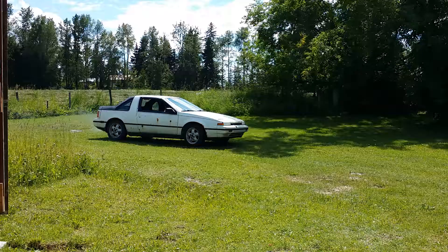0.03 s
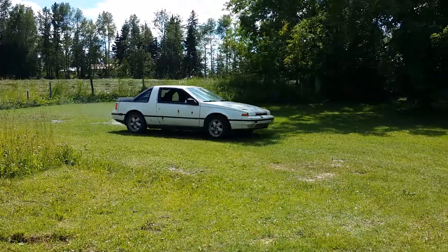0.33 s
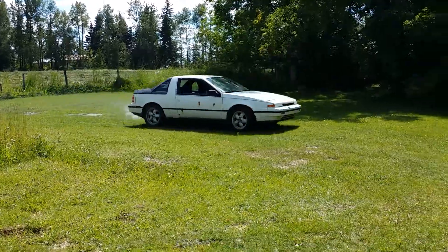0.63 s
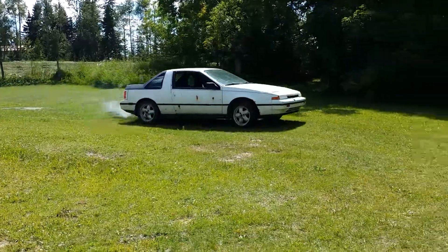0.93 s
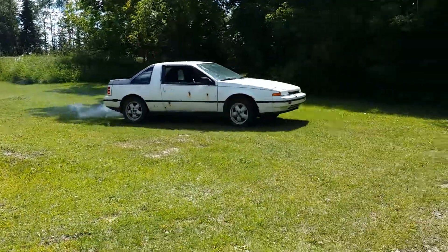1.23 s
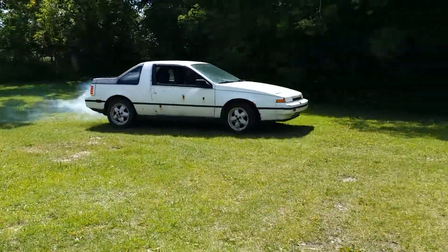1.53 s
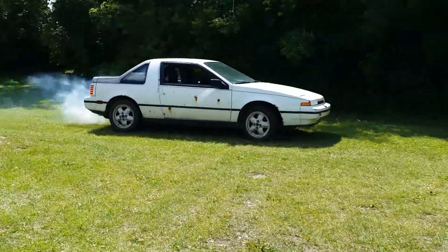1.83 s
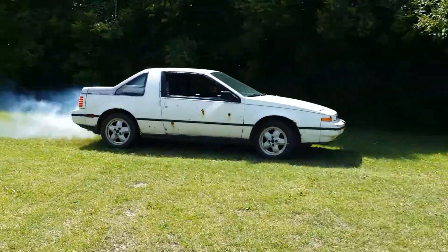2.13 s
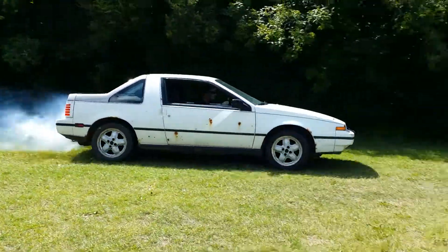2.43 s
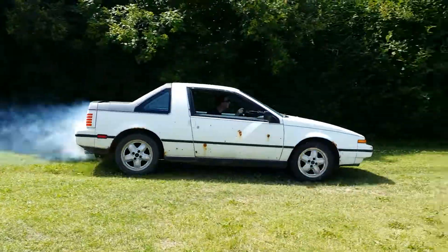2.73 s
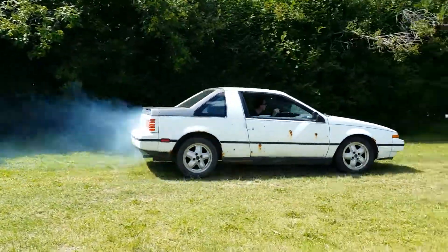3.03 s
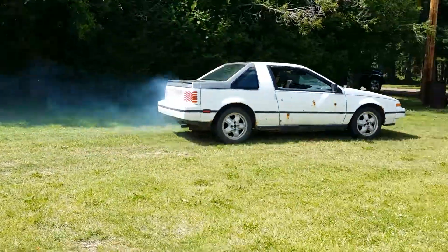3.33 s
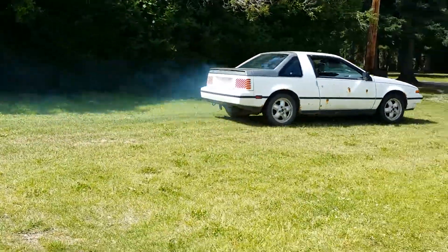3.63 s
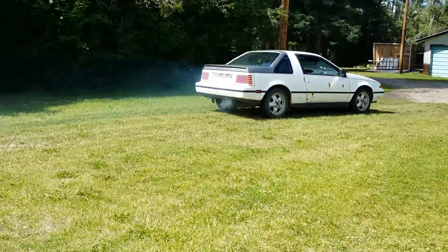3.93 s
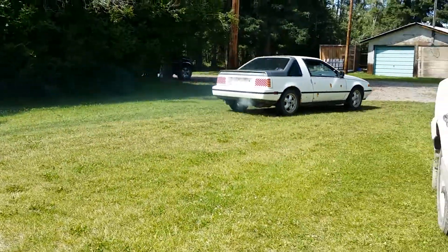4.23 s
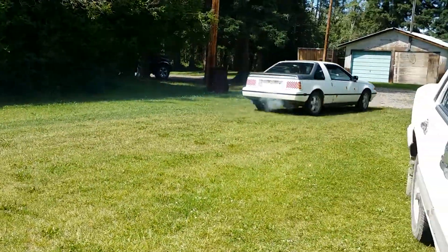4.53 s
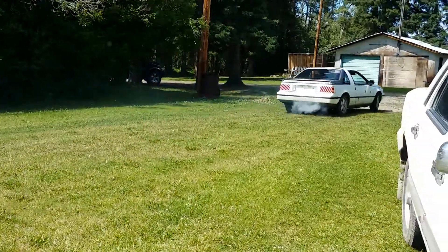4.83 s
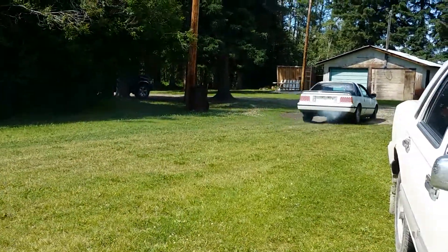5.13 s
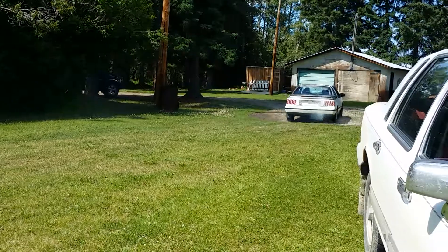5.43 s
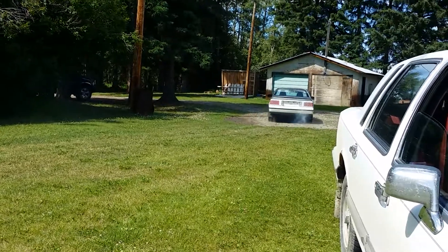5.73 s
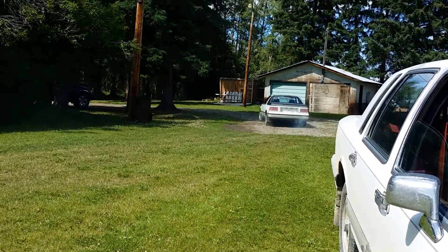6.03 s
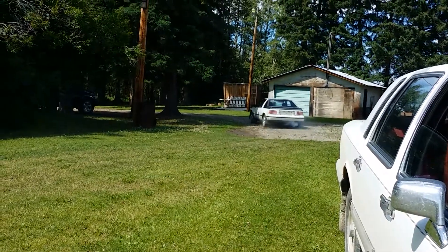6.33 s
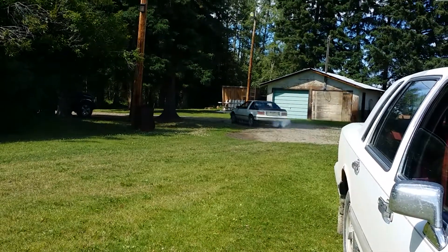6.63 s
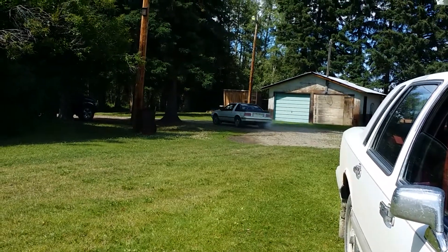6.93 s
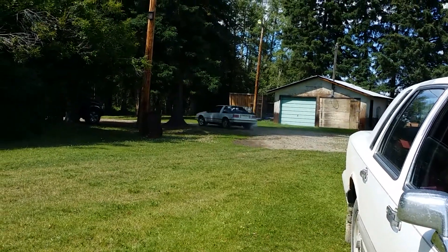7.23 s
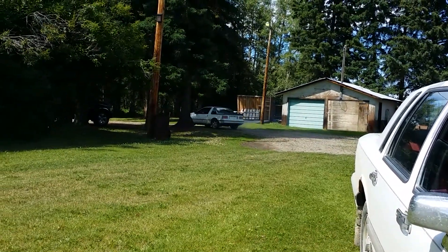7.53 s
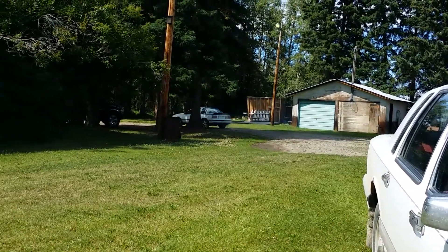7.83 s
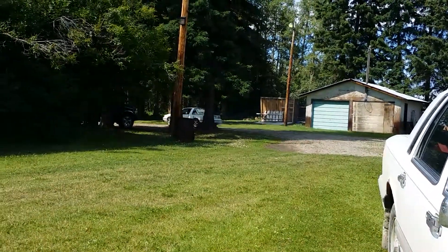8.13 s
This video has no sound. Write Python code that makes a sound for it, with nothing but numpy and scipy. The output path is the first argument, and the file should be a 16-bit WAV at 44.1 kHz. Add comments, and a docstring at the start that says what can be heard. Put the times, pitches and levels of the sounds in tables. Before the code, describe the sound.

Outdoors in a yard, a loud, misfiring car engine revs up, drops back as it passes near the microphone and carries on unevenly into the distance. Its leaky exhaust thumps, drones and rasps over a soft whirr of tyres and fan. A low knock sounds close by, then a short metallic rattle and several sharp exhaust pops come from the departing car, echoing faintly.

```python
"""An old car's rough, uneven chugging swells up, passes close by and pulls away across a lawn. Each firing of
its four cylinders thumps the muffler, rings the pipe and hisses out of the exhaust leaks. When a cylinder cuts
out the engine limps and rasps; coasting, it purrs evenly. The loose pipe rattles, sharp pops crack out of it,
and a leak under the floor sputters as the car passes. Behind all this are the whirr of fan and tyres, one dull
knock and faint echoes from trees and buildings."""
import sys
import numpy as np
from scipy import signal
from scipy.io import wavfile
from scipy.ndimage import uniform_filter1d, minimum_filter1d, map_coordinates

SR = 44100
rng = np.random.default_rng(int(sys.argv[2]) if len(sys.argv) > 2 else 0)


def output_pcm(signal):
    """Save a mono or channel-first signal as 16-bit PCM at the path in sys.argv[1].

    Samples are clipped to [-1, 1] before scaling.
    """
    pcm = np.clip(np.atleast_2d(signal).T, -1, 1) * 32767
    wavfile.write(sys.argv[1], SR, np.round(pcm).astype(np.int16))


N = 360738
TIME = np.arange(N) / SR

# How long the yard's echoes take to fade by 60 dB: pitch_hz, fade_s
ECHO_FADE = [(100, 1), (700, 0.32), (3000, 0.15), (10000, 0.021)]
# Loudness of the fan and tyres: time_s, level_db
WHIRR_LEVEL = [(.42, -31.5), (.8, -28.5), (2.3, -29), (2.8, -34), (3.7, -36.5), (5.4, -35.5), (5.46, -41),
               (5.8, -34.5), (7.2, -35.5), (8.18, -40)]
# Tone colours, that is, how strong each pitch is in a sound: pitch_hz, gain_db
WHIRR_TONE = [(30, 0.5), (200, 10), (700, 8.5), (1050, -0.5), (1450, -1.5), (1700, -4.5), (2000, -2),
              (2100, 5), (2210, -5), (2450, -5.5), (2750, -4.5), (3000, -8), (3350, -5.5), (4400, -9),
              (5900, -10.5), (7400, -16.5), (15500, -27)]
RATTLE_TONE = [(300, -29), (780, 18.5), (950, -5), (1150, 13.5), (1400, -0.5), (1800, -4), (2250, -7),
               (3500, -27), (4700, -21), (5500, 9.5), (6300, -1.5), (7500, -17.5), (15500, -33)]
FLOOR_LEAK_TONE = [(150, -18), (400, 3.5), (520, -1), (700, 4), (850, -9), (1050, -1), (1500, -26),
                   (2300, -13), (3500, -22), (5800, -22), (8000, -33), (15500, -47)]
ECHO_TONE = [(120, -7), (700, 3), (8000, 2)]
POP_CRACK_TONE = [(500, -28), (2000, -4), (3200, -7), (5600, 4), (7500, -1.5), (11000, -11), (15500, -20)]
POP_BARK_TONE = [(40, -2), (130, 2), (450, 6.5), (730, 19.5), (920, 8.5), (1300, 10), (2000, -8.5),
                 (5000, -38.5)]
# Tone of the pipe and of the gas jets from three sides: pitch_hz, side_db, rear_corner_db, behind_db
PIPE_TONES = [(29.6, -32, -29, -55), (72.4, -4, 15, -1), (109.7, 14, 13, 6.5), (143, 4.5, 9, 4.5),
              (202, 2.5, 6, 9), (227.6, 6, 10, 10), (270.5, -5, 7, -9), (328, -5.5, 2, -18),
              (420, -9, -14, -13.5), (470, -15, -9.5, -10.5), (561, -5, -12, -10), (678, -4, -7, -2),
              (721, 1.5, 0, -5.5), (783, -5.5, -9, -4.5), (948, -23, -30, -28), (1055, -29, -17.5, -12.5),
              (1415, -21, -24.5, -34.5), (4300, -68, -45, -49), (9000, -98, -78, -57)]
JET_TONES = [(306, -6, -15, -40), (960, 6.5, -12, 14.5), (1570, 1, 7.5, 14), (1630, -18, -1.5, 2),
             (2110, -6, 3.5, 11), (2390, -14, 1.5, 6), (2750, 8, 4.5, 2), (2950, -14, -1.5, -5),
             (3200, 4.5, 0, -3.5), (4050, -0.5, -0.5, -3), (5250, 2.5, -4, 4), (6060, 5.5, -0.5, 6),
             (7220, -7.5, -12, -5), (10700, -10.5, -18, -9), (15600, -15.5, -27.5, -21)]
# Sharp pops from the pipe: time_s, relative_crack_db, relative_bark_db
PIPE_POPS = [(1.4467, -15, -5), (3.008, -23.5, -24), (6.407, -16, -13), (6.447, -13, -22), (6.566, -23, -6),
             (6.5955, -16.5, -13), (6.797, -18, -4), (6.8085, -20, -9), (6.819, -19.5, -5),
             (6.840, -22, -4), (6.8505, -16.5, -7), (6.860, -34, -9), (6.880, -28, -7.5), (6.891, -18, -2),
             (6.899, -18, -6), (6.928, -12, -1.5), (6.9765, -32, -4), (6.9958, -14, -1),
             (7.3975, -10.5, -5.5), (7.482, -12, -9.5)]
# When the loose pipe shakes: start_s, end_s, level_db
RATTLE_SPELLS = [(2.2, 2.532, -51), (6.379, 6.602, -26)]
# The muffler's three pitch ranges: time_s, relative_boom_db, relative_drone_db, hollow_note_db
MUFFLER_LEVELS = [(0.6, -13.5, -14, -35), (0.68, -11.5, -13.5, -21), (1.0, -15.5, -9.5, -27.5),
                  (1.08, -13, -18, -24.5), (1.92, -14, -11, -21.5), (2.18, -10, -31, -18),
                  (2.32, -12.5, -15, -17.5), (2.45, -25, -10.5, -31), (2.53, -11.5, -18.5, -22),
                  (2.83, -14.5, -18, -24), (2.91, -12, -22.5, -24), (3.19, -14, -11.5, -33.5),
                  (4.01, -19, -20, -26.5), (4.6, -19, -19.5, -17), (4.76, -22, -13.5, -30),
                  (5.18, -16.5, -19.5, -29), (5.29, -20.5, -17.5, -23), (5.39, -20, -32, -25),
                  (5.46, -11, -25, -36), (5.51, -20.5, -31, -27.5), (5.75, -20, -22, -31),
                  (5.83, -21.5, -15.5, -32), (6.13, -24, -23, -27), (6.57, -19, -27.5, -18.5),
                  (6.7, -13.5, -22, -32.5), (6.78, -24, -35, -27), (6.85, -18, -34, -19.5),
                  (6.97, -19.5, -21, -26), (7.48, -21.5, -16, -27.5), (7.62, -18.5, -26, -30),
                  (7.68, -23, -13, -27.5), (7.92, -18.5, -24, -21), (8.03, -20, -47, -24.5)]
# Direction of the car, as how late its sound reaches the left ear: time_s, delay_ms
LEFT_EAR_DELAY = [(.5, -0.045), (2.7, -0.13), (3.7, 0.065), (5.2, 0.1), (8.1, 0.0053)]
# Slow rise and fall in the loudness of the bark and rasp: time_s, swell (10 means no change)
BARK_AND_RASP_SWELL = [(.4, 45), (2.8, 6.3), (4, 5.1), (6, 28), (8.2, 11.2)]
# Engine speed: time_s, firings_per_s
ENGINE_SPEED = [(0.42, 62.56), (0.87, 85.14), (1.2, 91.65), (1.62, 99.67), (1.65, 103.86), (2.34, 124.23),
                (2.49, 125.04), (2.56, 115.99), (2.64, 110.42), (2.82, 109.12), (3.32, 91.04), (3.6, 85.97),
                (3.95, 82.35), (4.25, 85.44), (4.42, 85.17), (4.59, 91.76), (4.9, 94.18), (5.08, 83.49),
                (5.3, 92.0), (5.46, 85.95), (5.6, 88.34), (5.8, 86.89), (6.02, 88.46), (6.13, 91.82),
                (6.28, 94.12), (6.4, 98.76), (6.6, 102.68), (6.74, 90.48), (6.94, 105.23), (7.08, 94.36),
                (7.22, 87.06), (7.44, 95.59), (7.67, 94.09), (8.18, 102.88)]
# When a cylinder weakens or cuts out: start_s, end_s, cylinder (0-3), change_db, extra_scatter_db (for all)
MISFIRE_SPELLS = [(.42, 2.02, 1, -20, 1.3), (.62, 1.9, 3, -3, .5), (2.17, 2.52, 1, -18, .6),
                  (2.17, 2.52, 0, -14, 0), (3.48, 3.9, 3, -12, 1.5), (3.88, 4.43, 0, -26, 0),
                  (3.88, 4.92, 1, -24, 0), (5.48, 6.62, 3, -20, 1.3), (6.78, 7.02, 3, -40, 1.5),
                  (7.35, 7.65, 0, -7, 1), (7.35, 7.65, 3, -12, 1)]
# Pedal pushes, held until the next push or release: start_s, first_opening, last_opening (0-1), rasp_db
PEDAL_PUSHES = [(.63, 0, 1, 4), (2.17, 1, 1, 7), (3.85, 0.04, 0.55, 7.5), (4.44, 0.93, 0.91, -0.5),
                (4.7, 0.77, 1, -7), (5.2, 0.47, 0.23, -1.5), (5.55, 0, 0.29, 4.5), (6.3, 0.71, 0.25, 7.5),
                (6.79, 0.1, 0, 11.5), (7.35, 0.1, 0.26, 7), (7.68, 0.01, 0.34, 2)]
# When the pedal is let go: time_s
PEDAL_RELEASES = (2.52, 4.897, 5.4, 6.62, 7.0, 7.52, 7.97)
# The four cylinders are not quite equally strong: strength_db for each
CYLINDER_STRENGTHS = (-0.048, -1.06, 1, 0.0049)
# What adds up to the pipe's bark and the leaks' rasp:
# coasting_db, per_doubled_swell_db, full_pedal_db, letting_go_db, from_side_db
BARK_LEVELS = (-39.5, 3.5, 13.5, 7, 0.5)
RASP_LEVELS = (-47.5, 1.8, 15, 10, -1.5)

# The car turns from its side to its rear corner, then to its tail: start_s, end_s
TURN_TO_CORNER_S, TURN_TO_TAIL_S = (3.3, 4.299), (4.7, 5.798)
BOOM_TOP_HZ, DRONE_TOP_HZ, NOTE_TOP_HZ = 150, 240, 420  # the bark lies above these three ranges


def gain_of(db):
    """Turns decibels into a number to multiply by."""
    return 10 ** (np.asarray(db) / 20)


def evened(x):
    """Scales a sound so its average power is 1."""
    return x / np.sqrt(np.mean(x ** 2) + 1e-20)


def steady(x, size=8001):
    """Levels out slow loudness changes; single firings still stand out."""
    window = np.hanning(size)
    power = signal.fftconvolve((np.atleast_2d(x) ** 2).mean(0), window / window.sum(), "same")
    return x / np.sqrt(abs(power) + 1e-12)


def curves(rows):
    """Joins a table's points in time with straight lines, one curve per column."""
    times, *columns = np.transpose(rows)
    return [np.interp(TIME, times, column) for column in columns]


def at_pitch(table, hz):
    """Looks up a table's value at each pitch."""
    pitches, values = np.transpose(table)
    return np.interp(np.log(hz + 1), np.log(pitches), values)


def colour(x, tone, size=8192):
    """Gives a sound a tone colour that rings after each push, never before."""
    log_gain = np.log(gain_of(at_pitch(tone, abs(np.fft.fftfreq(size, 1 / SR)))))
    spectrum = np.exp(np.conj(signal.hilbert(log_gain)))
    ring = np.fft.ifft(spectrum).real[:size // 2]
    return signal.oaconvolve(np.atleast_2d(x), ring[None], axes=1)[:, :N]


def turning(x, tones):
    """Blends three tone colours as the tailpipe swings toward the listener."""
    side = np.interp(TIME, TURN_TO_CORNER_S, [1, 0])
    behind = np.interp(TIME, TURN_TO_TAIL_S, [0, 1])
    shares = side, 1 - side - behind, behind
    hz, *views = np.transpose(tones)
    return sum(share * evened(colour(x, np.c_[hz, db])) for share, db in zip(shares, views))


def below(x, hz, order=4):
    """Keeps the part of a sound below a pitch."""
    return signal.sosfiltfilt(signal.butter(order, hz, fs=SR, output="sos"), x)


def lagged(x, lag_s):
    """Follows x smoothly, a little late."""
    keep = np.exp(-1 / (lag_s * SR))
    return signal.lfilter([1 - keep], [1, -keep], x)


def noise_pair(likeness):
    """Noise for two ears; a likeness of 1 makes them the same."""
    shared, *own = rng.standard_normal((3, N))
    return np.sqrt(likeness) * shared + np.sqrt(1 - likeness) * np.array(own)


def pushes(times, db):
    """One sharp push of pressure at each time."""
    train = np.zeros(N)
    np.add.at(train, np.clip(np.round(times * SR).astype(int), 0, N - 1), gain_of(db))
    return train


def puff(rise_s, size=2000):
    """The shape of a puff: a fast rise to 1, then a slower fall."""
    age = np.arange(size) / SR / rise_s
    return age * np.exp(1 - age)


def puffs(train, rise_s):
    """Stretches each push into a puff."""
    return signal.oaconvolve(train, puff(rise_s))[:N]


def firing_count():
    """How far the engine has turned, counted in firings."""
    return np.cumsum(curves(ENGINE_SPEED)[0]) / SR + 1.022


def yard_echoes(x, size=256):
    """Trees and walls scatter the sound back; high pitches fade first."""
    bounces = rng.standard_normal((2, SR)) * (rng.random((2, SR)) < .04) * (TIME[:SR] > .008)
    bounces += below(bounces[0] - bounces, 920, order=2)  # both ears get the same lows
    hz, age_s, spectrum = signal.stft(bounces, SR, nperseg=size)
    fade = gain_of(-60 * age_s / at_pitch(ECHO_FADE, hz)[:, None])
    tail = signal.istft(spectrum * fade, SR, nperseg=size)[1]
    echoes = signal.fftconvolve(x, tail / np.linalg.norm(tail[0]), axes=1)[:, :N]
    return colour(echoes, ECHO_TONE)


def knock(start_s=5.421, pitch_hz=65.6):
    """A soft, low bump with a tick, close to the listener."""
    shape = puff(rise_s=.0084)
    thud = gain_of(-19) * shape * np.sin(2 * np.pi * pitch_hz * TIME[:len(shape)])
    tick = gain_of(-24) * puff(rise_s=.00021) * rng.standard_normal((2, len(shape)))
    sound, start = np.zeros((2, N)), round(start_s * SR)
    sound[:, start:start + len(shape)] = thud + tick
    return sound


def whirr(ripple_depth=.15):
    """Fan, valves and tyres make a wash of noise that ripples with the engine."""
    ripple = 1 + ripple_depth * np.sin(2 * np.pi * firing_count())
    wash = colour(noise_pair(.41) * ripple, WHIRR_TONE)
    return gain_of(curves(WHIRR_LEVEL)[0]) * evened(wash)


def pipe_pops(crack_fade_s=.003, crack_trim_db=-1, bark_trim_db=8):
    """A sharp pop: gas cracks out and one hard push rings the pipe."""
    times, crack_db, bark_db = np.transpose(PIPE_POPS)
    bursts = lagged(pushes(times, crack_db + crack_trim_db), crack_fade_s) * crack_fade_s * SR
    cracks = colour(bursts * noise_pair(.75), POP_CRACK_TONE)
    barks = colour(pushes(times, bark_db + bark_trim_db), POP_BARK_TONE)
    return cracks + barks


def pipe_rattle(train):
    """While the loose pipe shakes, each firing gives it a crisp metal clack."""
    shaking = sum(gain_of(db) * ((TIME >= start) & (TIME < end)) for start, end, db in RATTLE_SPELLS)
    clacks = evened(puffs(train, rise_s=.00028)) * noise_pair(.9)
    return lagged(shaking, .0071) * evened(colour(clacks, RATTLE_TONE))


def floor_leak(times, db, pass_at_s=3.193, pass_width_s=.16, limp_db=-5):
    """Gas sputters from under the floor as the car passes, every other puff weaker."""
    train = pushes(times, db + limp_db * (np.arange(len(times)) % 2 == 0))
    gas = evened(puffs(train, rise_s=.0019) * noise_pair(.97))
    nearness = np.exp(-.5 * ((TIME - pass_at_s) / pass_width_s) ** 2)
    return gain_of(-30.5) * nearness * steady(colour(evened(train) + gas, FLOOR_LEAK_TONE))


def leak_rasp(times, db, scatter_db=3):
    """Each firing blows a jet of gas out of the leaks, over a hiss that drops as the car turns away."""
    hiss = np.interp(TIME, TURN_TO_CORNER_S, [.66, .22])
    uneven_db = db + scatter_db * rng.standard_normal(len(times))
    jets = evened(puffs(pushes(times, uneven_db), rise_s=.0022))
    return steady(turning((hiss + jets) * noise_pair(.59), JET_TONES))


def pipe_bark(train, pipe_highs, swirl_share=.32):
    """Swirling gas in each puff roughens the pipe's higher notes."""
    swirl = turning(puffs(train, rise_s=.0049) * noise_pair(1), PIPE_TONES)
    swirl_highs = swirl - below(swirl, NOTE_TOP_HZ)
    return steady(evened(pipe_highs) + swirl_share * evened(swirl_highs))


def rear_chamber(x, round_trip_s=.00931, reflection=.38):
    """The muffler's big chamber lets each push out in several bounces, filling the gaps between barks."""
    trip = np.zeros(round(round_trip_s * SR) + 1)
    trip[[0, -1]] = 1, -reflection
    return -signal.lfilter(trip[::-1], trip, x)


def muffler(times, train, hollow_note, backflow=.44):
    """The firings thump the muffler: a deep boom and a drone, joined by the pipe's hollow note."""
    boom_db, drone_db, note_db = curves(MUFFLER_LEVELS)
    # every stroke draws some gas back, so a dead cylinder sucks instead of pushing
    thumps = turning(train - backflow * pushes(times, db=0), PIPE_TONES)
    boom = below(thumps, BOOM_TOP_HZ)
    drone = below(thumps, DRONE_TOP_HZ) - boom
    return (gain_of(boom_db - 1) * steady(rear_chamber(boom))
            + gain_of(drone_db - 3) * steady(drone)
            + gain_of(note_db) * steady(hollow_note))


def bark_and_rasp_gains(pedal_lag_s=.017, letting_go_s=.034):
    """Pedal, angle and a slow swell set the bark and rasp; both linger briefly after a release."""
    opening, extra_rasp_db = np.zeros((2, N))
    moves = [row[0] for row in PEDAL_PUSHES] + list(PEDAL_RELEASES)
    for start, first, last, extra_db in PEDAL_PUSHES:
        end = min(move for move in moves if move > start)
        held = (TIME >= start) & (TIME < end)
        opening[held] = np.linspace(first, last, held.sum())
        extra_rasp_db[held] = extra_db
    load = lagged(opening, pedal_lag_s)
    letting_go = np.maximum(lagged(load, letting_go_s) - load, 0)
    swell_doublings = np.log2(curves(BARK_AND_RASP_SWELL)[0] / 10)
    side = np.interp(TIME, TURN_TO_CORNER_S, [1, 0])
    amounts = np.array([np.ones(N), swell_doublings, load, letting_go, side])
    bark_db, rasp_db = np.array([BARK_LEVELS, RASP_LEVELS]) @ amounts
    return gain_of(bark_db), gain_of(rasp_db + lagged(extra_rasp_db, pedal_lag_s))


def firings(scatter_db=1.4, jitter_s=.00008):
    """When and how hard the cylinders fire: nearly even, but erratic while one misfires."""
    count = firing_count()
    number = np.arange(2, int(count[-1]))
    times = np.interp(number, count, TIME)
    cylinder = number % len(CYLINDER_STRENGTHS)
    db = np.array(CYLINDER_STRENGTHS)[cylinder]
    for start, end, weak_cylinder, change_db, extra_scatter_db in MISFIRE_SPELLS:
        during = (times >= start) & (times < end)
        db = db + change_db * during * (cylinder == weak_cylinder)
        scatter_db = scatter_db + extra_scatter_db * during
    strength_chance, timing_chance = rng.standard_normal((len(times), 2)).T
    return times + jitter_s * timing_chance, db + scatter_db * strength_chance


def exhaust():
    """The same firings drive the muffler, the pipe and the leaks."""
    times, db = firings()
    train = pushes(times, db)
    pipe = turning(train, PIPE_TONES)
    pipe_lows = below(pipe, NOTE_TOP_HZ, order=6)
    hollow_note = pipe_lows - below(pipe, DRONE_TOP_HZ)
    bark_gain, rasp_gain = bark_and_rasp_gains()
    bark = bark_gain * pipe_bark(train, pipe - pipe_lows)
    rasp = rasp_gain * leak_rasp(times, db)
    return muffler(times, train, hollow_note) + bark + rasp + pipe_rattle(train) + floor_leak(times, db)


def scene():
    """The car, its echoes and the knock, as two ears hear them."""
    car = exhaust() + pipe_pops() + whirr()
    shift = curves(LEFT_EAR_DELAY)[0] / 1000 * SR / 2  # each ear takes half the delay
    direct = np.array([map_coordinates(ear, [np.arange(N) + sign * shift], order=3, mode="nearest")
                       for ear, sign in zip(car, (-1, 1))])
    echo_share = gain_of(np.interp(TIME, [3, 7], [-19, -14]))  # grows as the car leaves
    mix = direct + yard_echoes(car * echo_share) + knock()
    bass_gain = gain_of([[1.15], [-1.25]])  # more bass on the left, less on the right
    return mix + below(mix, 600, order=2) * (bass_gain - 1)


def record(dry, start_s=.424, swell_s=.14, ceiling_db=-1, recovery_db_per_s=150, top_hz=15800):
    """Swells the sound up from silence, turns down the loudest peaks and cuts the very top."""
    since_s = np.maximum(TIME - start_s, 0)
    faded_in = dry * np.minimum(since_s / .0053, 1) * gain_of(-23.5 * np.exp(-since_s / swell_s))
    peak_db = 20 * np.log10(abs(faded_in).max(0) + 1e-9)
    recovery_db = recovery_db_per_s * TIME
    held_peak_db = np.maximum.accumulate(peak_db + recovery_db) - recovery_db
    over_db = np.maximum(held_peak_db - ceiling_db, 0)
    limited = faded_in * gain_of(uniform_filter1d(minimum_filter1d(-over_db, size=41), size=41))
    top_cut = signal.firwin(511, top_hz, window=("kaiser", 9), fs=SR)
    return signal.oaconvolve(limited, top_cut[None], "same")


dry = scene()
out = record(dry)
output_pcm(out)
```